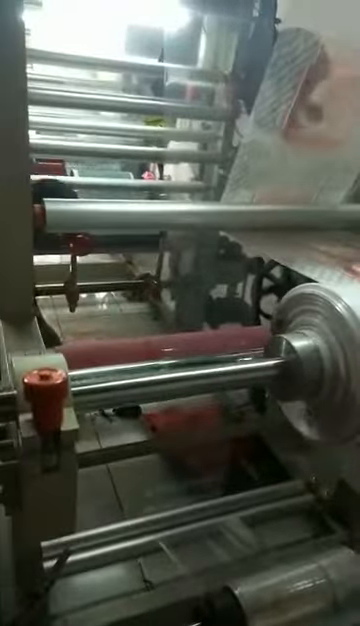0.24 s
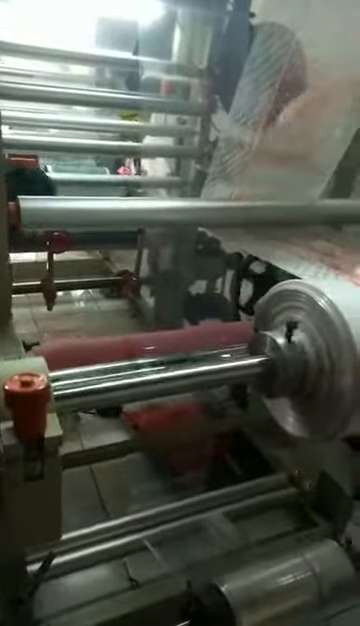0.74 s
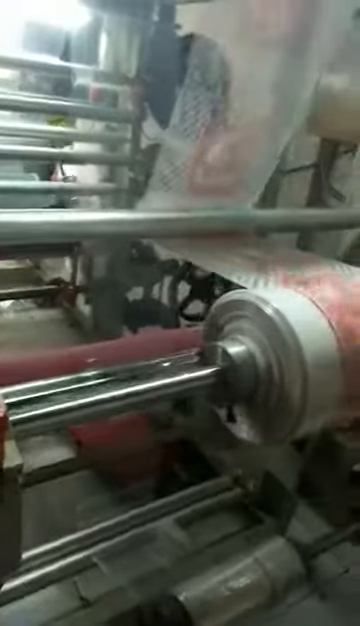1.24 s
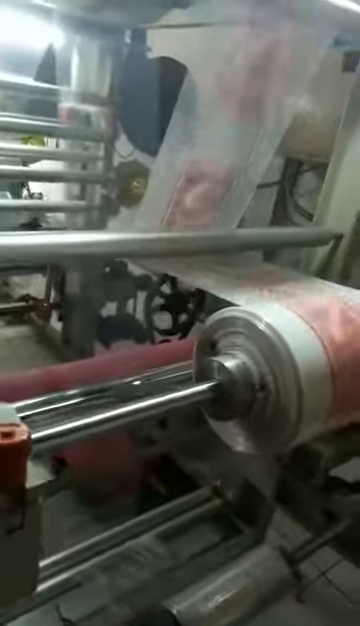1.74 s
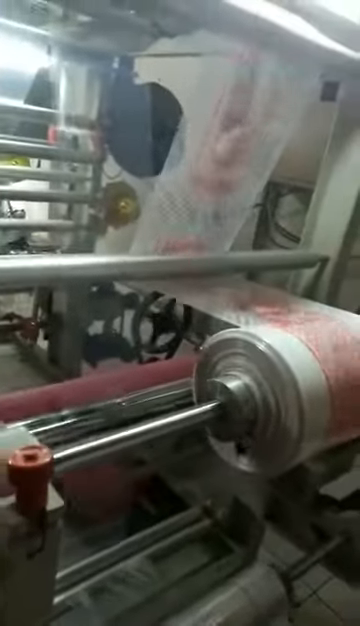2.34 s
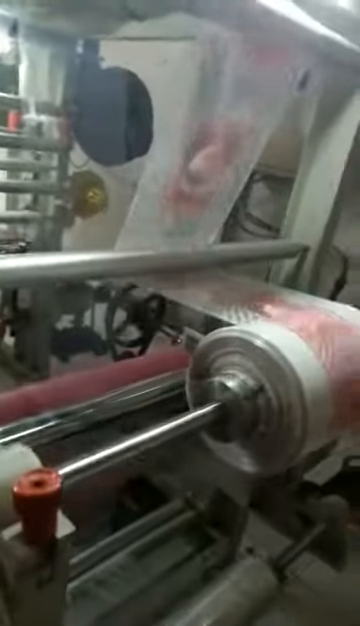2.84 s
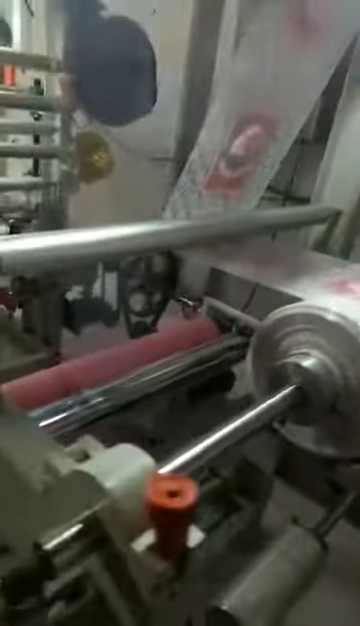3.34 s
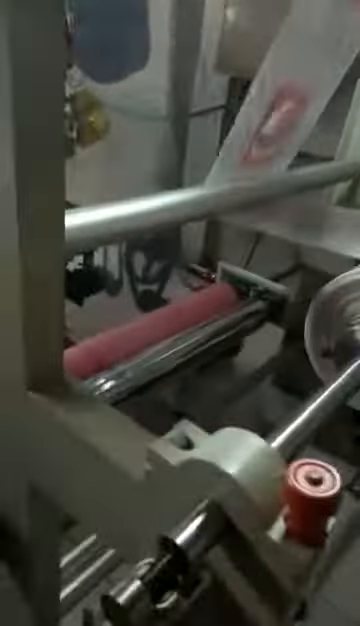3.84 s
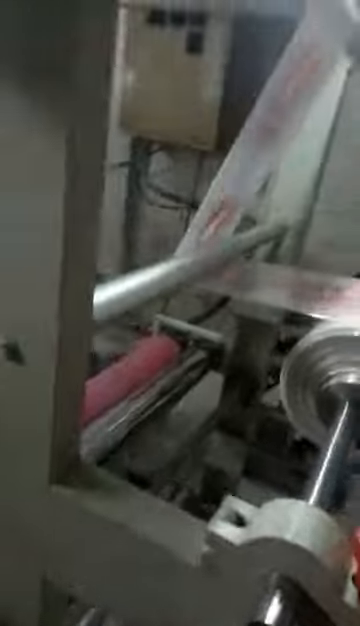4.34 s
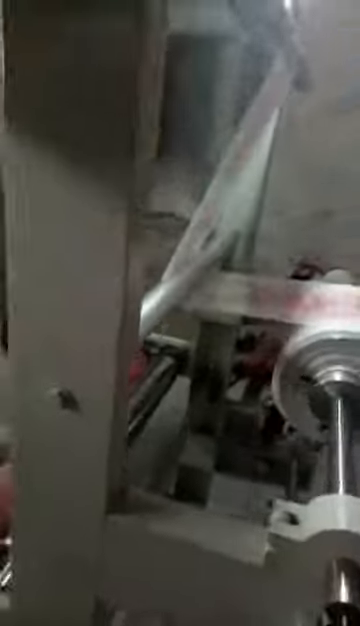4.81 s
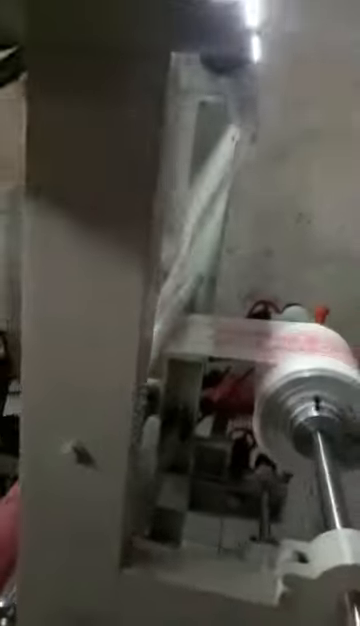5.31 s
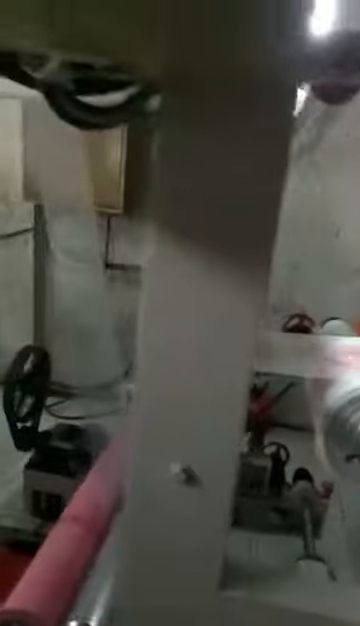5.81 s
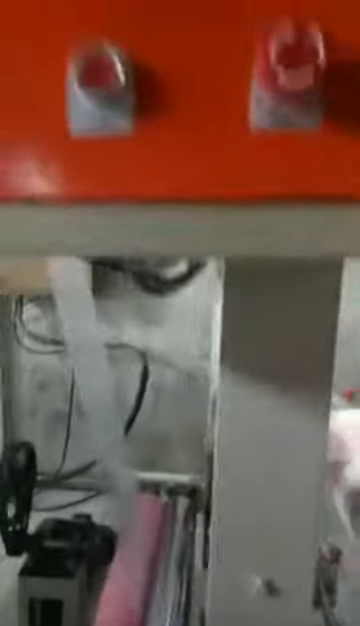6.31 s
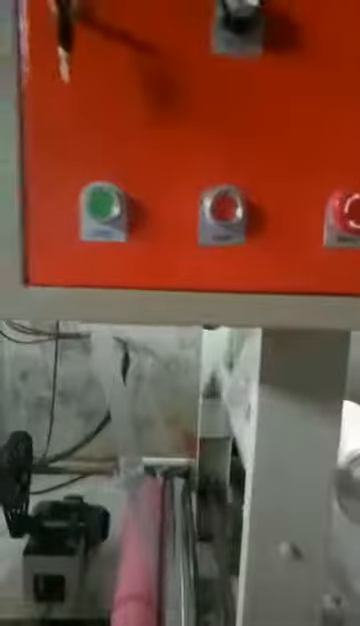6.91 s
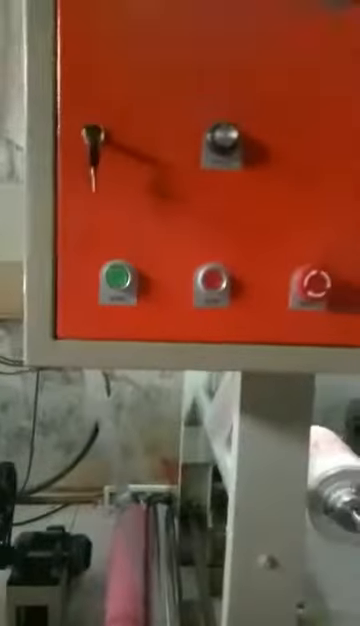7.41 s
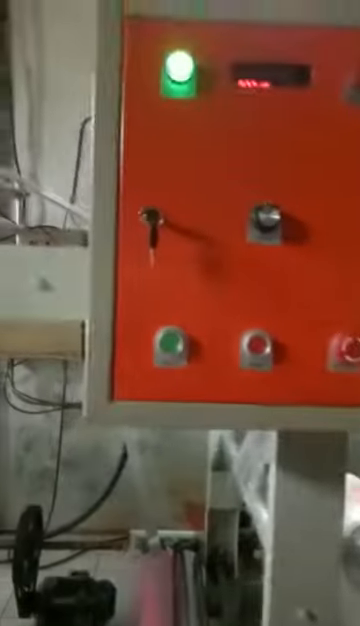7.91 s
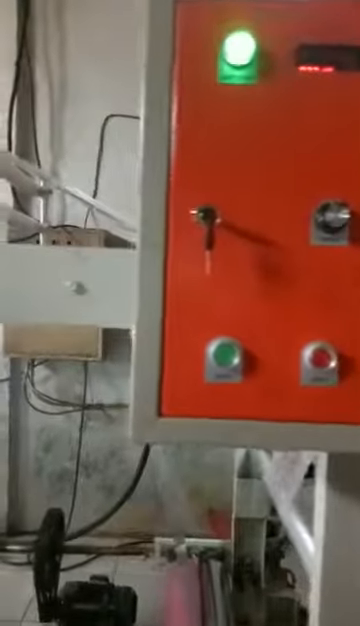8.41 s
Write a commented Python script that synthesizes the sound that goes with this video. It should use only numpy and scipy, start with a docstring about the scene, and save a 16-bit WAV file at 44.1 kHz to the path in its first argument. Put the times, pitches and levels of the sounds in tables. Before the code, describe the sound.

A roll-fed film printing machine drones loudly in a hard-walled workshop, humming, whining and hissing, with brief air puffs and a valve clack midway.

```python
"""Hum, whine and rumble of a roll-fed film printing machine at speed, film hissing over its rollers. Hard-
walled workshop, microphone carried along the machine. Tones: lines with wandering reflections. Rolling and
sliding: shaped noise. The motor drive sings high above; a bearing chirps faintly. The film crinkles once, as
random snaps, and later swishes softly, then scuffs: shaped noise. Short puffs, like air, are noise jets ringing
an outlet; the room answers; the loudest starts with a clack."""
import sys
import numpy as np
from scipy import signal
from scipy.fft import rfft, irfft, next_fast_len
from scipy.io import wavfile

SR = 44100
rng = np.random.default_rng(int(sys.argv[2]) if len(sys.argv) > 2 else 0)


def dump(signal):
    """Clip the signal to [-1, 1] and save it as 16-bit WAV at the path in sys.argv[1]."""
    limited = np.clip(np.atleast_2d(signal).T, -1, 1)
    pcm = np.round(limited * 32767).astype(np.int16)
    wavfile.write(sys.argv[1], SR, pcm)


N = 381906
TIME_S = np.arange(N) / SR
FFT_SIZE = next_fast_len(N + SR)
BIN_HZ = np.maximum(np.arange(FFT_SIZE // 2 + 1) * SR / FFT_SIZE, 1)

# Levels and spectra are relative: trims or rms scaling follow.
# Main motor hum, fading as the microphone leaves it behind: [t/s, level/dB]
HUM_LEVEL = [(0.0, -25.5), (3.4, -27.3), (5.0, -29), (5.5, -32), (6.0, -30.5), (6.8, -46), (7.5, -34),
             (8.2, -36), (8.7, -52)]
# Gear whines, swelling and fading through the room's standing waves: [t/s, level/dB]
LOW_WHINE_LEVEL = [(0.0, -24), (0.35, -23.5), (0.7, -27), (1.1, -44), (1.45, -30), (2.25, -27),
                   (2.65, -30.5), (3.05, -46), (3.3, -33), (3.65, -31.5), (4.1, -44), (4.45, -31),
                   (5.0, -39), (6.0, -35), (6.45, -29.5), (6.8, -30.5), (7.7, -23), (8.2, -27), (8.7, -40)]
MID_WHINE_LEVEL = [(0.0, -43), (1.0, -41), (1.8, -32.5), (2.2, -35), (2.45, -44), (2.85, -35.5),
                   (3.15, -46), (3.6, -50), (4.2, -42), (4.7, -48), (5.8, -43), (8.7, -43)]
UPPER_WHINE_LEVEL = [(0.0, -41), (1.2, -38), (1.7, -41), (2.6, -30.5), (3.2, -37), (3.8, -50), (5.3, -46),
                     (6.0, -30.5), (6.9, -43), (7.5, -38), (8.7, -36)]
HIGH_WHINE_LEVEL = [(0.0, -41), (1.1, -34.5), (2.4, -47), (3.4, -37), (4.2, -30.5), (4.7, -39), (5.1, -32),
                    (5.6, -35), (6.2, -44), (6.9, -36), (7.5, -39), (8.5, -30)]
HUM_HZ, LOW_WHINE_HZ, MID_WHINE_HZ, UPPER_WHINE_HZ, HIGH_WHINE_HZ = 165.7, 586.7, 664.5, 929.6, 1327.6
# Second, unsteady motor note:
# [f/Hz, scatter/1, mid-walk level/dB, gain over walk/dB, gain beside upright/dB]
MOTOR_TONES = [(146.2, 0.8, -36, -4, -2)]

# Broad machine noises by part: (mid-walk level/dB, gain over walk/dB, gain beside upright/dB)
NOISE_LEVELS = {"floor": (-35, 2.7, -1.3), "frame": (-24, -0.45, -2.8), "rollers": (-29.5, 0.73, 4.55),
                "bearings": (-26, 2, -1.2), "film": (-34.5, 0.46, 0)}
# Rolling noise as the frame radiates it: [f/Hz, level/dB per Hz]
ROLLING_SPECTRUM = [(22, -14), (34, -31), (48, -23.5), (68, -15.5), (85, -13), (112, -11), (145, -2.5),
                    (180, 0), (250, -6.5), (295, -2.5), (375, -5.5), (440, -4.5), (640, -7), (900, -10)]
# Gear chatter and sliding film: [f/Hz, level/dB per Hz]
SLIDING_SPECTRUM = [(800, 1.5), (1250, -2.5), (1520, -3), (1730, -6), (2000, -5), (2400, -9), (3200, -10.5),
                    (4300, -10.5), (4950, -16), (5550, -25.5), (6950, -26.5), (7600, -40), (13000, -42.5),
                    (15000, -56)]
# Frame and roller resonances: [f/Hz, width/Hz, lift over the noise/dB]
FRAME_MODES = [(288, 5.6, -2), (422, 110, 1.5), (553, 13, 0.5), (706, 17, 0.5), (1048, 44, 3.5),
               (1450, 150, 2)]
# Gear chatter: [t/s, level/dB]
CHATTER_LEVEL = [(0.0, -25.5), (1.3, -24.5), (2.2, -24.5), (2.7, -24), (3.6, -25), (4.7, -24.5), (5.1, -24),
                 (7.5, -24.5), (8.7, -23.0)]
CHATTER_SWAY_DB, FILM_FLUTTER_DB = 0.85, 0.6
FILM_FOLLOWS = 0.96  # share of the chatter's dB swing taken up by the film hiss
# Microphone passes close to an upright of the frame
PASS_S, PASS_HALF_S = 4.3, 1.7

# Gear, motor and drive notes that stand out in places: {f/Hz: [(t/s, half length/s, level/dB)]}
SWELLING_TONES = { 339.5: [(2.3, 2.8, -33.5), (4.4, .65, -30), (5.7, .6, -34), (7.2, .25, -32.5)],
                  436: [(1.7, .5, -38), (2.9, .22, -33), (5.0, .4, -39)], 497.1: [(1.1, .7, -38),
                  (4.3, .6, -39), (6.1, .35, -35.5), (8.3, .7, -33.5)], 531: [(7.05, .22, -35)],
                  623.2: [(.7, .6, -39.5), (4.2, .6, -37), (5.9, .4, -40), (7.15, .25, -37),
                  (8.1, .5, -37)], 796.4: [(1.7, .8, -43), (3.5, .9, -41)], 857: [(2.5, .3, -43),
                  (6.05, .35, -35), (8.0, .6, -42.5)], 1173.9: [(1.2, 1.1, -44), (3.4, .3, -41.5),
                  (5.3, 1.1, -37.5), (7.9, .8, -40.5)], 1246.2: [(2.6, .9, -40.5), (5.0, .35, -41),
                  (6.1, .35, -40.5)], 1308.5: [(2.3, .8, -43), (6.9, .35, -40), (8.2, .5, -41)],
                  4855.4: [(1.9, .6, -56.5), (7.1, .7, -55.5)], 4974: [(1.9, .3, -54.5), (2.7, .25, -57),
                  (7.9, .7, -58.5)], 5095.4: [(.4, .8, -52), (2.55, .3, -52.5), (7.7, .4, -54.5),
                  (8.4, .25, -52)], 5214: [(1.0, .5, -57.5), (1.9, .22, -53.5), (4.4, .2, -57),
                  (5.3, .25, -55.5), (6.7, .22, -54.5), (8.2, .4, -56)], 5334: [(1.62, .2, -53.5),
                  (2.6, .28, -55), (5.7, .18, -54.5), (6.3, .15, -58), (8.2, .3, -56)]}
RESTING_DB = -12  # floor between swells, re the note's strongest
SWELL_SCATTER = 0.22
# Weaker shaft and gear-mesh tones: [f/Hz, level/dB]
GEAR_TONES = [(70.1, -51), (359, -42), (1194.8, -51), (2344.2, -56)]
# Pair of motor-drive switching tones: [f/Hz, level/dB]
DRIVE_TONES = [(7952, -79.5), (8048, -79)]
# Drive whistle: [t/s, level/dB]
WHISTLE_LEVEL = [(0.0, -60), (4.9, -63.5), (5.8, -57), (6.2, -62), (7.3, -59), (7.5, -65), (8.7, -58)]
WHISTLE_HZ, WHISTLE_SCATTER, WHISTLE_DRIFT_DB = 13243, 0.55, 1.2

# Puffs, a slow soft film swish at 4.9 s and a faint scuff at 6.22 s:
# [t/s, attack/s, length/s, level/dB, body re edge/dB, lowest body f/Hz,
#  outlet ring/1, hardness/0-1, sputter/dB]
HISSES = [(3.079, 0.016, 0.042, -35, 1, 3600, 0.81, 0, -0.5),
          (3.144, 0.015, 0.042, -45.5, 12.5, 3200, 0.85, 0.1, 2.5),
          (3.568, 0.022, 0.046, -31.5, 5.5, 1400, 0.84, 1, 0.5),
          (3.635, .01, 0.094, -46.5, 11, 3200, 1, 1, 3.5), (4.9, .1, 0.29, -56, 13, 2000, 0, 0, 0),
          (6.222, 0.02, 0.042, -50.5, 15, 2000, 0.03, 1, 1)]
# Thin edge of a hiss: [f/Hz, level/dB per Hz]
HISS_EDGE_SPECTRUM = [(2000, -24), (3400, -2), (4600, 3), (5150, -3), (5600, -2), (6500, -8), (8200, -16.5),
                      (12000, -21), (14000, -17), (15200, -40)]
# Fuller body of a hiss: [f/Hz, level/dB per Hz]
HISS_BODY_SPECTRUM = [(900, -22), (1500, -8), (2500, 2), (2900, 4), (3600, 1.5), (4300, 0.5), (4800, -7),
                      (5500, -23), (7500, -44)]
# Resonances of the puffs' outlet: [f/Hz, width/Hz, lift in light jet/dB, lift in hard jet/dB]
OUTLET_MODES = [(1550, 130, 0, 8), (2020, 110, 4, 11), (3465, 80, 12, 6), (4110, 130, -2, 7),
                (4250, 100, 8.5, 2), (4510, 140, 1, 7), (4830, 90, 8, 3), (5470, 60, 7, 0),
                (5620, 70, 10.5, 1)]
HISS_FLUTTER_DB, HISS_FLUTTER_HZ = 1.6, 70

# Valve clack, then a weaker one: [t/s, level/dB]
CLACKS = [(3.575, -21.5), (3.715, -30)]
# Clack colour: [f/Hz, level/dB per Hz]
CLACK_SPECTRUM = [(900, -23), (1500, -1), (2050, 0.5), (2400, -6.5), (3400, -2.5), (4200, 1), (5200, -11),
                  (8000, -34)]
# Valve body resonances: [f/Hz, width/Hz, lift/dB]
CLACK_MODES = [(1480, 220, 3.5), (2040, 70, 7), (4250, 200, 2)]
CLACK_ATTACK_S, CLACK_DECAY_S, CLACK_RATTLE_DB = 0.01, 0.054, 2.4

# Swells of the film's crinkle: [t/s, half length/s, level/dB]
RUSTLES = [(2.51, .055, -41.5), (2.62, .075, -41.5), (2.745, .035, -39.5), (2.85, .09, -49)]
# Crinkling film: [f/Hz, level/dB per Hz]
RUSTLE_SPECTRUM = [(1800, -7), (3500, 6), (5000, 3), (6400, -6), (8200, -16), (10500, -18), (12500, -15),
                   (14000, -15), (15200, -36)]
CREASES_PER_S, CREASE_SPREAD_DB, RUSTLE_ROOM_DB = 600, 3.2, -3

# Dry roller bearing chirps: [t/s, level/dB]
CHIRPS = [(3.88, -52), (5.21, -52), (5.84, -59), (6.53, -55)]
CHIRP_HZ = 6600

# Workshop decay: [f/Hz, T60/s]
ROOM_T60 = [(1000, 0.77), (4000, 1.0), (8000, 0.65), (14000, 0.45)]
# Left-right correlation: [f/Hz, likeness/1]
LIKENESS = [(60, 0.95), (200, 1), (380, 0.67), (690, 0.53), (1280, -0.13), (2400, -0.033), (14000, -0.22)]
# Colour difference of the microphone ports: [f/Hz, left re right/dB]
PORT_DIFFERENCE = [(60, 5), (330, 6), (550, 6), (800, 5), (1200, 7), (1800, 5.5), (2800, 1), (4100, -6),
                   (4950, -11.5), (5600, -10.5), (6600, 0), (9000, 0)]
LEFT_PORT_LAG_S = 0.00017
PEAK_TOP = 0.56  # full scale = 1
CUTOFF_HZ = 15200


def from_db(db):
    """Decibels to amplitude gain."""
    return 10 ** (np.asarray(db) / 20)


def rms_one(x):
    """Scale to unit rms."""
    return x / np.sqrt(np.mean(x ** 2) + 1e-20)


def in_time(rows):
    """Timed table, interpolated linearly."""
    return np.interp(TIME_S, *np.transpose(rows))


def over_hz(points):
    """Spectral table, interpolated along log frequency."""
    hz, value = np.transpose(points)
    return np.interp(np.log(BIN_HZ), np.log(hz), value)


def hump(centre_s, half_s):
    """Bell-shaped swell, 1 on top, 1/e at half_s from the centre."""
    return np.exp(-((TIME_S - centre_s) / half_s) ** 2)


def panned(left_re_right_db):
    """Left and right gains for a level difference."""
    return from_db(np.array([[1], [-1]]) * left_re_right_db / 2)


def drift(rate_hz):
    """Random wander of unit rms: white noise through two equal poles at rate_hz."""
    step = 40  # samples between computed points
    pole = np.exp(-2 * np.pi * rate_hz * step / SR)
    noise = rng.standard_normal(N // step + 2002)
    slow = signal.lfilter([1], [1, -2 * pole, pole * pole], noise)[2000:]  # drop the start-up
    return np.interp(np.arange(N) / step, np.arange(len(slow)), rms_one(slow))


def band(low_hz, high_hz, order=12):
    """Band-pass gain; each edge alone is 3 dB down at its frequency."""
    return 1 / np.sqrt((1 + (low_hz / BIN_HZ) ** order) * (1 + (BIN_HZ / high_hz) ** order))


def resonance(hz, width_hz):
    """Complex gain of one resonance, 1 on top."""
    return 1 / (1 + 1j * (BIN_HZ ** 2 - hz ** 2) / (BIN_HZ * width_hz))


def peaks_db(modes):
    """Lift of a spectrum by a set of resonances."""
    return sum(db * abs(resonance(hz, width_hz)) ** 2 for hz, width_hz, db in modes)


def diffuse(colour, force=1):
    """Coloured noise from a varying force, correlated between ports per LIKENESS; rms 1."""
    mid, side = rfft(rng.standard_normal((2, N)) * force, FFT_SIZE)
    alike = np.clip(over_hz(LIKENESS), -1, 1)
    both = np.sqrt(1 + alike) * mid + np.sqrt(1 - alike) * side * [[1], [-1]]
    return rms_one(irfft(both * colour, FFT_SIZE)[:, :N])


def tone(hz, scatter, rate_hz):
    """Steady line plus reflections, whose strength and phase shift as the microphone moves; rms 1."""
    shared = drift(rate_hz) + 1j * drift(rate_hz)
    own = np.array([drift(rate_hz) + 1j * drift(rate_hz) for _ in range(2)])
    alike = np.clip(np.interp(hz, BIN_HZ, over_hz(LIKENESS)), 0, 1)
    field = 1 + scatter * (np.sqrt(alike) * shared + np.sqrt(1 - alike) * own)
    carrier = np.exp(2j * np.pi * (hz * TIME_S + rng.random()))
    return rms_one(np.real(field * carrier))


def along_walk(mid_db, gained_db, beside_db):
    """Source gain: steady dB change along the walk, plus a swell or shadow beside the upright."""
    progress = TIME_S / TIME_S[-1] - 0.5
    closeness = 1 / (1 + ((TIME_S - PASS_S) / PASS_HALF_S) ** 2)
    return from_db(mid_db + gained_db * progress + beside_db * closeness)


def motors():
    """Main motor hum, four gear whines and the second motor note: lines with wandering reflections."""
    hum = from_db(in_time(HUM_LEVEL) - 0.44) * tone(HUM_HZ, scatter=0.04, rate_hz=1.5)
    low = from_db(in_time(LOW_WHINE_LEVEL) - 1.5) * tone(LOW_WHINE_HZ, scatter=0.084, rate_hz=5.4)
    mid = from_db(in_time(MID_WHINE_LEVEL) + 2.5) * tone(MID_WHINE_HZ, scatter=0.5, rate_hz=5.4)
    upper = from_db(in_time(UPPER_WHINE_LEVEL) - 3.5) * tone(UPPER_WHINE_HZ, scatter=0.39, rate_hz=3.9)
    high = from_db(in_time(HIGH_WHINE_LEVEL) - 3.0) * tone(HIGH_WHINE_HZ, scatter=0.12, rate_hz=2.5)
    whine = panned(-4.0) * low + panned(-6.0) * mid + panned(0.5) * (upper + high)
    second = sum(along_walk(*levels) * tone(hz, scatter, rate_hz=2.25)
                 for hz, scatter, *levels in MOTOR_TONES)
    return hum + whine + from_db(0.2) * second


def rollers():
    """Rolling contact shakes floor and frame; gear teeth and sliding film add a fine uneven grain."""
    gain = {part: along_walk(*levels) for part, levels in NOISE_LEVELS.items()}
    chatter_db = in_time(CHATTER_LEVEL)
    film_gain = gain["film"] * from_db(FILM_FOLLOWS * (chatter_db - chatter_db.mean()))

    modes_db = peaks_db(FRAME_MODES)
    rolling = from_db(over_hz(ROLLING_SPECTRUM) + modes_db)
    sliding = from_db(over_hz(SLIDING_SPECTRUM) + modes_db)

    floor = gain["floor"] * diffuse(rolling * band(11, 126.6), from_db(0.94 * drift(3)))
    frame = gain["frame"] * diffuse(rolling * band(102.0, 284), from_db(0.39 * drift(0.85)))
    roll = gain["rollers"] * diffuse(rolling * band(244, 476), from_db(0.42 * drift(6.9)))
    bearings = gain["bearings"] * diffuse(rolling * band(518, 920))
    gear_force = from_db(0.79 * drift(74) + CHATTER_SWAY_DB * drift(8.2))
    gears = from_db(chatter_db - 3.5) * diffuse(sliding * band(852, 2750), gear_force)
    film_force = from_db(0.78 * drift(50) + FILM_FLUTTER_DB * drift(10.6))
    film = film_gain * diffuse(sliding * band(2420, 18000), film_force)
    return floor + frame + roll + bearings + gears + film


def swelling_notes():
    """Each note swells where the microphone meets its standing waves and sinks back between them."""
    out = 0
    for hz, swells in SWELLING_TONES.items():
        level = np.max([from_db(db) * hump(s, half_s) for s, half_s, db in swells], axis=0)
        resting = from_db(RESTING_DB) * level.max()
        out = out + np.hypot(level, resting) * tone(hz, SWELL_SCATTER, rate_hz=4.3)
    return from_db(1.0) * out


def whines():
    """Gear-mesh tones, the drive's pair of switching tones and its thin, high whistle."""
    gears = sum(from_db(db) * tone(hz, scatter=0.42, rate_hz=0.81) for hz, db in GEAR_TONES)
    drive = sum(from_db(db) * tone(hz, scatter=1.5, rate_hz=2.9) for hz, db in DRIVE_TONES)
    whistle_db = in_time(WHISTLE_LEVEL) + WHISTLE_DRIFT_DB * drift(5.3)
    whistle = from_db(whistle_db) * tone(WHISTLE_HZ, WHISTLE_SCATTER, rate_hz=23)
    return from_db(2.0) * gears + from_db(11.5) * drive + from_db(2.0) * whistle


def hisses(release_s=0.023, room_db=0.0, sputter_hz=45):
    """Puffs: sputtering jets ring an outlet, lower when hard; film swish and scuff: noise, barely rung."""
    light_db = peaks_db([(hz, width_hz, db) for hz, width_hz, db, _ in OUTLET_MODES])
    hard_db = peaks_db([(hz, width_hz, db) for hz, width_hz, _, db in OUTLET_MODES])
    out = 0
    for s, attack_s, length_s, db, body_db, low_hz, ring, hardness, sputter_db in HISSES:
        rise = np.clip((TIME_S - s) / attack_s, 0, 1)
        fall = np.exp(-np.maximum(TIME_S - s - length_s, 0) / release_s)
        outlet_db = ring * (light_db + np.clip(hardness, 0, 1) * (hard_db - light_db))
        edge = rms_one(from_db(over_hz(HISS_EDGE_SPECTRUM) + outlet_db))
        body_band = band(low_hz, CUTOFF_HZ, order=6)
        body = rms_one(from_db(over_hz(HISS_BODY_SPECTRUM) + outlet_db) * body_band)
        body_gain = from_db(body_db)
        noise = np.hypot(1, body_gain) * diffuse(np.hypot(edge, body_gain * body))
        out = out + from_db(db + sputter_db * drift(sputter_hz)) * rise * fall * noise
    flutter = from_db(2.5 + HISS_FLUTTER_DB * drift(HISS_FLUTTER_HZ))
    return flutter * (out + from_db(room_db) * workshop(out))


def clack(room_db=-6.0):
    """Rough knocks, as of a valve: decaying noise rings its body and the room answers."""
    blows = 0
    for s, db in CLACKS:
        attack = np.clip((TIME_S - s) / CLACK_ATTACK_S, 0, 1)
        decay = np.exp(-np.maximum(TIME_S - s, 0) / CLACK_DECAY_S)
        blows = blows + from_db(db) * attack * decay
    ringing = diffuse(from_db(over_hz(CLACK_SPECTRUM) + peaks_db(CLACK_MODES)))
    out = blows * from_db(CLACK_RATTLE_DB * drift(130)) * ringing
    return out + from_db(room_db) * workshop(out)


def rustle(snap_s=0.0012, level_db=2.0):
    """Creases snap at random in the passing film, each a tiny bright crack."""
    swell = sum(from_db(db) * hump(s, half_s) for s, half_s, db in RUSTLES)
    strength = from_db(CREASE_SPREAD_DB * np.minimum(rng.exponential(1, N), 3))
    snaps = (rng.random(N) < CREASES_PER_S / SR) * strength
    force = signal.lfilter([1], [1, -np.exp(-1 / (snap_s * SR))], snaps + 1e-18)
    out = from_db(level_db) * swell * diffuse(from_db(over_hz(RUSTLE_SPECTRUM)), force)
    return out + from_db(RUSTLE_ROOM_DB) * workshop(out)


def chirps(half_length_s=0.05):
    """The dry bearing swells into a thin note and fades again."""
    level = sum(from_db(db) * hump(s, half_length_s) for s, db in CHIRPS)
    return level * tone(CHIRP_HZ, scatter=0.4, rate_hz=15)


def workshop(x):
    """Room reverberation: ten feedback delays a side; the extreme treble dies first."""
    out = np.zeros((2, len(BIN_HZ)), complex)
    t60_s = np.maximum(over_hz(ROOM_T60), 0.05)
    for k, lag_s in enumerate(rng.uniform(0.014, 0.055, 20)):
        loop = from_db(-60 * lag_s / t60_s) * np.exp(-2j * np.pi * BIN_HZ * lag_s)
        out[k % 2] += loop / (1 - loop) * (-1) ** (k // 2)
    response = out / np.sqrt(np.mean(abs(out) ** 2))
    return irfft(rfft(x, FFT_SIZE) * response, FFT_SIZE)[:, :N]


def scene():
    """Running machine, short hisses and clack, crinkling film and chirping bearing."""
    machine = motors() + rollers() + swelling_notes() + whines()
    return machine + hisses() + clack() + rustle() + chirps()


def record(dry):
    """Ports add colour, the left one a delay; the highest peaks are rounded and the top is cut."""
    delay = np.exp(-2j * np.pi * BIN_HZ * LEFT_PORT_LAG_S * np.array([[1], [0]]))
    ports = panned(over_hz(PORT_DIFFERENCE)) * delay
    coloured = irfft(rfft(dry, FFT_SIZE) * ports, FFT_SIZE)[:, :N]
    rounded = coloured / (1 + (coloured / PEAK_TOP) ** 12) ** (1 / 12)
    low_pass = signal.ellip(10, 0.1, 80, CUTOFF_HZ, fs=SR, output="sos")
    return signal.sosfilt(low_pass, rounded)


dry = scene()
out = record(dry)
dump(out)
```